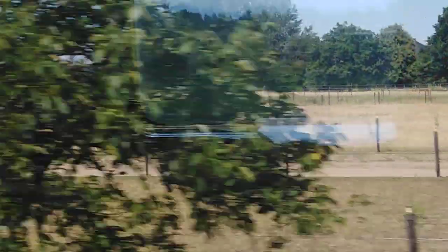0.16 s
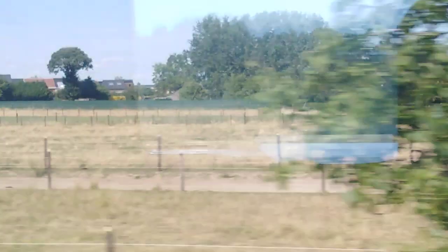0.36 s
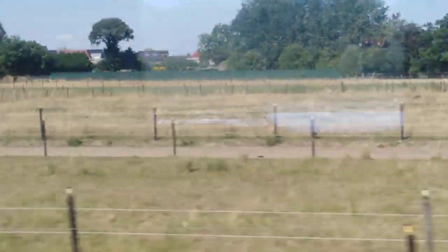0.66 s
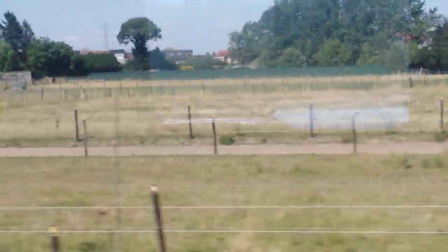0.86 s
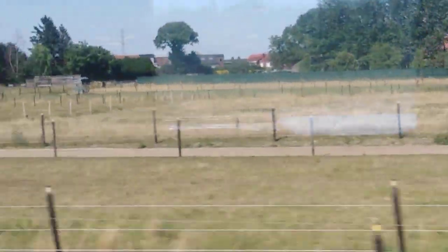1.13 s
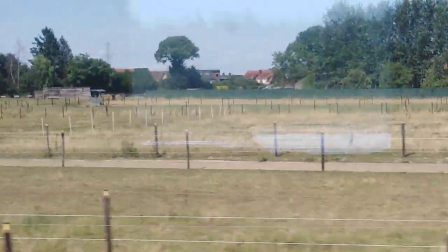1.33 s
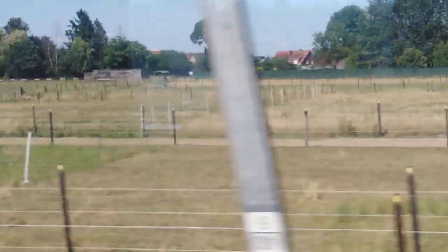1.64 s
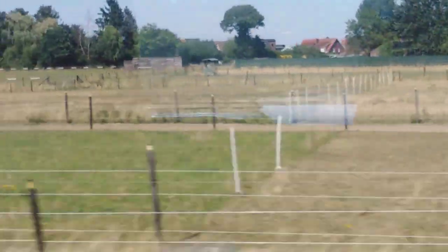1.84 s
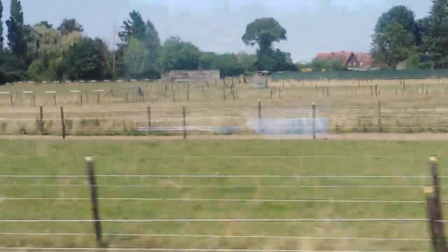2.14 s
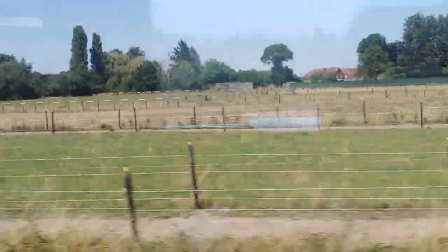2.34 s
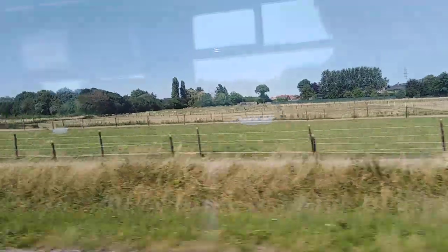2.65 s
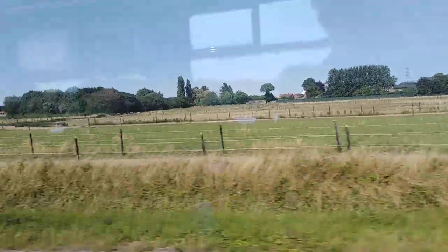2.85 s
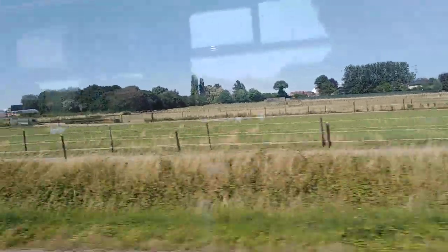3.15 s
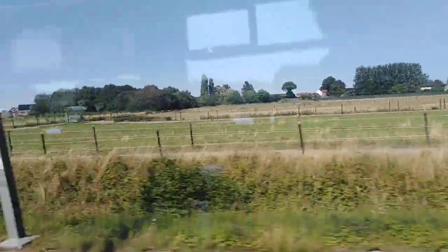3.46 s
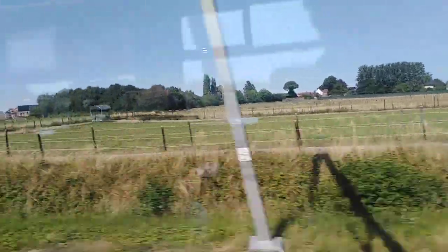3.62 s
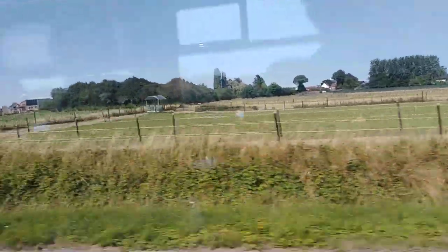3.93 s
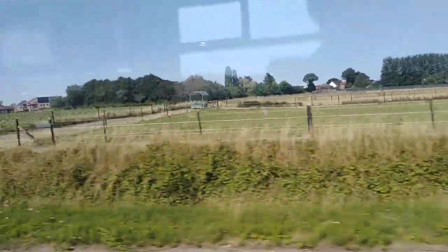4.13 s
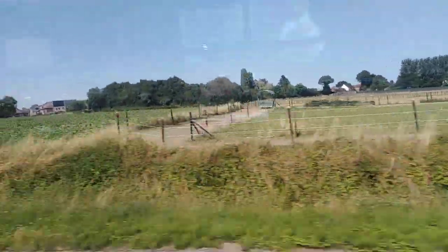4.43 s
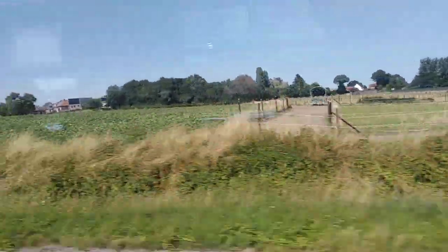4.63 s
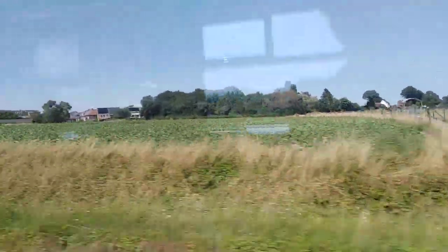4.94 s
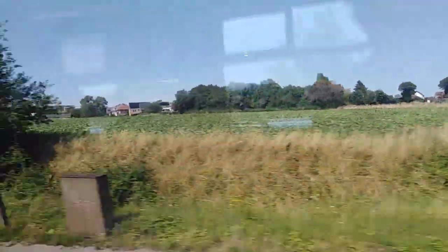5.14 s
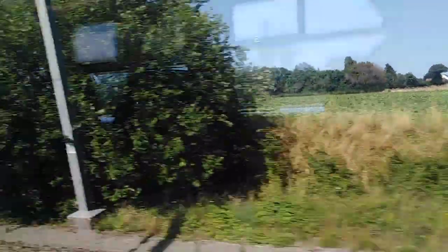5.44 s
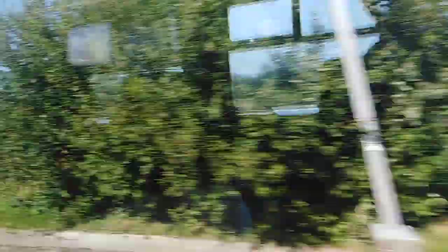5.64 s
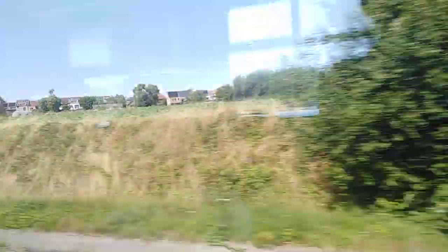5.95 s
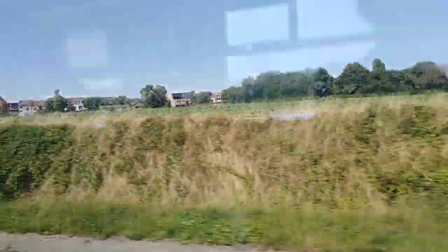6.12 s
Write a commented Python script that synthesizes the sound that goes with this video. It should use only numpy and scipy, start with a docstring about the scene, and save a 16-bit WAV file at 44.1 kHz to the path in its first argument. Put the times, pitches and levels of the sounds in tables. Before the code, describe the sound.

The whole stretch, a little over six seconds, is the inside of a passenger train already at speed and holding it. A deep, nearly centred floor boom and carriage drone run continuously, bumping up in soft irregular surges, notably around 0.6, 1.0, 2.5, 3.2, 4.25 and 5.6 seconds, with brief sags between. Above lies a broad rushing wheel and rail roar, swelling gently on rougher track, plus diffuse air hiss. A faint gear hum and a thin, fluttering motor whine of almost constant pitch waver, dipping near 1.75 and 3.15 seconds and fading at the end. Tiny dry trim ticks come at 1.3 and around 3.4 to 3.55; a minute very high squeak at 1.5. Short hollow rail howls rise around 4.8 to 4.95, then weaker at 5.5 and 5.9. The train keeps running to the end.

```python
"""Train carriage at speed

Inside a passenger train on welded track, at a window seat: the floor booms and the carriage drones as
resonant and coloured noise; wheel and rail roar later on the left and howl on rippled rail; air hisses.
Gears and motors sing faintly as wavering sines, the trim ticks as noise bursts and a panel seam squeaks once.
"""
import sys
import numpy as np
from scipy import signal
from scipy.fft import rfft, irfft
from scipy.io import wavfile
from scipy.ndimage import uniform_filter1d

SR = 44100
rng = np.random.default_rng(int(sys.argv[2]) if len(sys.argv) > 2 else 0)


def int16_out(signal):
    """Quantize to a 16-bit WAV file."""
    q = np.round(np.clip(np.atleast_2d(signal).T, -1, 1) * 32767)
    wavfile.write(sys.argv[1], SR, q.astype(np.int16))


N = 276948
TIME = np.arange(N) / SR
FREQ = np.maximum(np.arange(N // 2 + 1) * SR / N, 1)
LEFT_RIGHT = np.array([[1], [-1]])
WINDOW_LAG_S = 0.00037  # left behind right


def undb(db):
    """Decibels to amplitude gain."""
    return 10 ** (np.asarray(db) / 20)


def curves(table):
    """Columns of a timed table, interpolated to one value a sample."""
    s, *columns = np.transpose(table)
    return [np.interp(TIME, s, column) for column in columns]


def hump(s, half_s):
    """Gaussian rise and fall around time s, 1 at its top and 1/e at half_s either side."""
    return np.exp(-((TIME - s) / half_s) ** 2)


def contour(points):
    """Gain at every frequency from (Hz, dB) points, straight over log frequency."""
    hz, db = np.transpose(points)
    return undb(np.interp(np.log(FREQ), np.log(hz), db))


def colour(points):
    """Contour that falls steeply, by the fourth power of frequency, beyond both ends."""
    inside = np.minimum(FREQ / points[0][0], points[-1][0] / FREQ)
    return contour(points) * np.minimum(1, inside) ** 4


def resonances(modes):
    """Gain at every frequency of steep-sided (Hz, width Hz, dB) modes that add in power."""
    power = 0
    for hz, width_hz, db in modes:
        detune = (FREQ - hz) / width_hz * np.sqrt(2)
        power = power + (undb(db) / (1 + detune ** 2)) ** 2
    return np.sqrt(power)


def noise(gain, likeness=0, lag_s=0):
    """Stereo noise of a given density: a shared part, later on the left, and a diffuse part."""
    shared, left, right = rfft(rng.standard_normal((3, N))) * np.sqrt(SR / 2)
    share = np.clip(likeness, 0, 1)  # of the power
    direct = shared * np.exp(-1j * np.pi * FREQ * lag_s * LEFT_RIGHT)
    diffuse = np.array([left, right])
    return irfft(gain * (np.sqrt(share) * direct + np.sqrt(1 - share) * diffuse), N)


def steady(x, span_s):
    """Evens out the chance swells of a noise that last longer than span_s."""
    k = int(span_s * SR)
    power = uniform_filter1d(uniform_filter1d(np.mean(x ** 2, axis=0), k), k)
    return x * np.sqrt(power.mean() / power)


def walk(rate_hz):
    """Random levels held 1 / rate_hz seconds, slewed twice and scaled to a standard deviation of 1."""
    k = int(SR / rate_hz)
    steps = np.repeat(rng.standard_normal(N // k + 1), k)
    smooth = uniform_filter1d(uniform_filter1d(steps, k), k)[:N]
    return smooth / smooth.std()


def tone(hz, db, pan_db, lead_rad, waver_db, wander_rad):
    """Machine tone whose level and phase waver at each ear as the carriage sways; db is RMS."""
    phase = 2 * np.pi * np.cumsum(hz) / SR + lead_rad * LEFT_RIGHT / 2
    phase = phase + wander_rad * np.array([walk(14), walk(20)])
    level_db = db + pan_db * LEFT_RIGHT / 2 + waver_db * np.array([walk(13), walk(17)])
    return np.sqrt(2) * undb(level_db) * np.sin(phase)


def squeak():
    """Two panels rub at their seam for a moment: a short hump of resonant noise, very high and faint."""
    # Each row: centre in Hz, width in Hz, density in dB per Hz.
    seam_modes = [(13000, 600, -91), (14100, 550, -90)]
    return hump(s=1.477, half_s=.011) * noise(resonances(seam_modes))


def trim(tail_s=0.055, tail_db=-24, chatter_db=4.5):
    """Panels on either side slip with a tiny dry tick, then chatter briefly: decaying noise bursts."""
    # Each row: start in seconds, level before colouring in dB, left minus right in dB, decay in seconds.
    ticks = [(1.2915, -38, -11, .0007), (1.2974, -36.5, -8, .0009), (3.3712, -34, 12, .0003),
             (3.3795, -47, 6, .002), (3.3857, -46, 2, .0003), (3.551, -47, 4, .0003)]
    # Colour of the trim's ring. Each row: frequency in Hz, gain in dB.
    trim_colour = [(3000, -22), (6000, 3), (9000, 4.5), (12000, 4), (15000, -8)]
    envelope = np.zeros((2, N))
    chatter = undb(tail_db + chatter_db * walk(400))
    for s, db, pan_db, decay_s in ticks:
        age_s = np.maximum(TIME - s, 0)
        shape = (TIME >= s) * (np.exp(-age_s / decay_s) + chatter * np.exp(-age_s / tail_s))
        envelope += undb(db + pan_db * LEFT_RIGHT / 2) * shape
    return irfft(rfft(envelope * rng.standard_normal((2, N))) * colour(trim_colour), N)


def gears():
    """Two gearboxes with wheels of slightly different size sing on mesh harmonics and beat slowly."""
    mesh_hz = 517.5
    # Each row: multiple of the mesh rate, level in dB, left minus right in dB, left phase lead in rad.
    harmonics = [(2, -48.5, 1, -0.43), (4, -53, 9, 0.89)]
    # Each row: mesh offset in Hz, level relative to the harmonic in dB.
    gearboxes = [(-0.3, -1), (1.0, -6)]
    # Slow swell of the song. Each row: time in seconds, level change in dB.
    swell_db, = curves([(0, 0.5), (.5, 1.5), (3.3, 2.5), (4.4, -1.5), (6.28, -3)])
    song = 0
    for k, db, pan_db, lead_rad in harmonics:
        for offset_hz, box_db in gearboxes:
            hz = np.full(N, k * (mesh_hz + offset_hz))
            song = song + tone(hz, db + box_db + swell_db, pan_db, lead_rad, waver_db=2.5, wander_rad=0.3)
    return song


def drive():
    """The gears whine near their third mesh harmonic, with a fast uneven flutter and shaft-rate sidebands; a
    thin motor tone sings above."""
    shaft_hz, motor_hz = 51.7, 2189
    rasp_db, rasp_rate_hz = 2.5, 110
    # Each row: time in seconds, whine pitch in Hz.
    whine_hz, = curves([(0, 1544.5), (2.5, 1548.5), (6.28, 1551)])
    # Each row: time in seconds, whine level before flutter and waver in dB.
    whine_db, = curves([(0, -43.5), (.6, -43.5), (.85, -44), (1.15, -45), (1.5, -40), (1.76, -64),
                        (2.1, -43), (2.35, -43.5), (2.7, -43.5), (2.87, -43), (3.0, -42.5), (3.15, -58),
                        (3.35, -38), (3.48, -45), (3.6, -48), (3.95, -42), (4.08, -45), (4.26, -38),
                        (4.4, -44), (4.55, -39), (4.7, -39), (5.0, -47.5), (5.35, -40), (5.7, -43),
                        (6.03, -40.5), (6.28, -63)])
    # Each row: shaft orders above the whine, level relative to it in dB.
    shaft_sidebands = [(-1, -15), (1, -11), (2, -13)]
    # Each row: time in seconds, thin tone's level before waver in dB.
    motor_db, = curves([(0, -67), (.5, -47), (.9, -56), (1.5, -59), (2.2, -57), (6.28, -61)])

    flutter_db = rasp_db * walk(rasp_rate_hz)
    whine = tone(whine_hz, whine_db + flutter_db, pan_db=9, lead_rad=0.91, waver_db=1.7, wander_rad=0.73)
    sidebands = 0
    for k, db in shaft_sidebands:
        side_hz = whine_hz + k * shaft_hz
        sidebands = sidebands + tone(
            side_hz, whine_db + db, pan_db=-1, lead_rad=2.2, waver_db=4.0, wander_rad=1.2)
    motor = tone(np.full(N, motor_hz), motor_db, pan_db=-2, lead_rad=-0.3, waver_db=4.0, wander_rad=0.7)
    return whine + sidebands + motor


def howl():
    """Short ripples on the rail make it ring in a few broad resonances as the wheels run over them."""
    # Each row: centre in seconds, half length in seconds, level in dB.
    ripples = [(4.79, 0.12, -0.5), (4.94, 0.071, 2.5), (5.47, 0.089, -1), (5.877, 0.088, -4)]
    # Each row: centre in Hz, width in Hz, density before the ripple level in dB per Hz.
    howl_modes = [(600, 30, -59), (665, 26, -57), (814, 27, -54.5), (872, 31, -52), (990, 59, -59)]
    swell = np.sqrt(sum((undb(db) * hump(s, half_s)) ** 2 for s, half_s, db in ripples))
    lag_s = WINDOW_LAG_S * np.interp(FREQ, [650, 850], [.3, .9])
    ring = noise(resonances(howl_modes), likeness=0.92, lag_s=lag_s)
    return swell * steady(ring, span_s=.08)


def rolling(hiss_follows=0.3, rings_follow=0.4):
    """Rail and wheels roar in from the window side, louder on rough rail; air hisses all around."""
    rail_level_db, wheels_level_db, rings_level_db, air_level_db = -1, -1.24, -.5, -1.3
    # Broad spectra. Each row: frequency in Hz, density before level changes in dB per Hz.
    rail_colour = [(400, -73), (650, -67.5), (830, -57.5), (900, -60), (950, -61), (1030, -58), (1130, -62),
                   (1260, -64.5), (1400, -69.5), (2200, -115)]
    wheel_colour = [(1000, -76), (1420, -78), (1600, -62.5), (1680, -62.5), (1800, -63.5), (1960, -68),
                    (2220, -68), (2480, -72.5), (2800, -72.5), (3200, -77), (3620, -74), (4100, -83.5),
                    (6000, -100)]
    air_colour = [(1000, -82), (3000, -84), (4500, -81), (5500, -84), (7200, -84), (7680, -80.5),
                  (8250, -84), (8700, -94), (9200, -105), (11500, -108), (12500, -124)]
    # Wheels and running gear. Each row: centre in Hz, width in Hz, density before level changes in dB per Hz.
    ring_modes = [(803, 7.1, -60.5), (856, 11, -58.5), (937, 15, -71.5), (1050, 40, -62.5), (1265, 72, -68),
                  (1420, 86, -69.5), (1488, 27, -60), (1554, 38, -57), (1600, 20, -59), (1670, 7.9, -62.5),
                  (1750, 53, -61.5), (1855, 14, -66), (2204, 25, -76), (2227, 62, -70.5), (2480, 20, -69.5)]
    # Each row: centre in seconds, half length in seconds, rise of rail roar in dB, of wheel roar in dB.
    rough_rail = [(.5, 0.25, 2, 2.6), (1.435, 0.3, 1, 1.5), (1.993, 0.15, 1.5, 0.9), (2.48, .27, 1, 1),
                  (3.3, 0.36, 0, 2), (4.2, 0.26, .5, 2.9), (4.698, .17, 0, 1.5), (5.023, 0.3, 1.2, 1.5),
                  (5.7, 0.43, 1, 1.5)]
    # Each row: frequency in Hz, share of wheel power straight from the window.
    wheel_direct = [(1050, 0.28), (1250, 0.65), (1800, 0.6), (2200, 0.17), (2750, 0.27), (3400, 0.11)]
    # Hiss swell. Each row: time in seconds, level change in dB.
    air_db, = curves([(0, -0.7), (1.2, 0), (3.4, 0.4), (4.3, 1.6), (5.1, 1.2), (5.6, 0.9), (6.28, -0.6)])

    rail_db = sum(db * hump(s, half_s) for s, half_s, db, _ in rough_rail)
    wheel_db = sum(db * hump(s, half_s) for s, half_s, _, db in rough_rail)
    rail_likeness = np.interp(FREQ, [700, 850, 1100], [.3, .7, .2])
    directness = np.interp(FREQ, *np.transpose(wheel_direct))
    rail = steady(noise(colour(rail_colour), rail_likeness, WINDOW_LAG_S), span_s=0.14)
    wheels = steady(noise(colour(wheel_colour), directness, WINDOW_LAG_S), span_s=0.4)
    rings = steady(noise(resonances(ring_modes), directness, WINDOW_LAG_S), span_s=0.17)
    air = noise(colour(air_colour))

    flutter_db = 0.63 * walk(21.87)  # the contact patches wander over the rail
    treble = undb(wheels_level_db + wheel_db) * wheels
    treble = treble + undb(air_level_db + air_db + hiss_follows * wheel_db) * air
    roar = undb(rail_level_db + rail_db) * rail
    return roar + undb(rings_level_db + rings_follow * wheel_db) * rings + treble * undb(flutter_db)


def rumble():
    """Track unevenness shakes floor, cabin air, panels and shell: noise, mostly alike on both sides."""
    floor_level_db, cabin_level_db, panel_level_db = -3.7, -.5, -0.77
    lull_half_s = 0.021
    # Resonances. Each row: centre in Hz, width in Hz, density before level changes in dB per Hz.
    floor_modes = [(66.4, 15.5, -48.5), (74, 21, -41), (86.5, 25, -48.5)]
    cabin_modes = [(112.2, 15.4, -45), (128, 13.6, -45.5), (146.8, 8.6, -46)]
    panel_modes = [(203.5, 12.6, -47), (228.2, 18.5, -52.5), (261, 15, -60), (295, 8.6, -58),
                   (415.7, 6.3, -62), (431, 7.5, -62.5), (513.4, 19.5, -63), (570, 7.7, -66.5),
                   (666.3, 10.3, -60.5)]
    # Body shell. Each row: frequency in Hz, density before level changes in dB per Hz.
    shell_colour = [(30, -78), (50, -55.5), (130, -55), (175, -57), (265, -58.5), (315, -58), (350, -56),
                    (470, -64), (590, -61.5), (690, -63), (820, -70), (1100, -84)]
    # Track dips jolt a bogie and the floor booms. Each row: centre and half length in seconds, rise in dB.
    jolts = [(0.025, .04, 3), (0.5, 0.075, 6.5), (0.62, 0.036, 9), (0.92, .04, 7), (1.045, 0.028, 9.5),
             (1.44, 0.031, 2.5), (1.56, .03, 6), (1.768, 0.038, 6.5), (1.905, 0.032, 8), (2.154, .04, 3.5),
             (2.347, 0.076, 5), (2.54, 0.043, 9), (2.698, 0.05, 5), (2.914, 0.044, 4.5), (3.053, 0.036, 8),
             (3.19, 0.057, 10.5), (3.496, 0.046, 5), (3.64, .065, 5.5), (3.885, 0.025, 6.5),
             (4.062, 0.074, 6.5), (4.253, 0.05, 9.5), (4.404, 0.027, 7.5), (4.6, 0.037, 4.5),
             (5.09, .08, 4), (5.53, 0.045, 3), (5.611, 0.029, 10), (6.11, .05, 5.5), (6.234, .04, 0.5)]
    # Springs unload, the boom mostly sags. Each row: centre in seconds, level change in dB.
    lulls = [(.69, -14), (.8, -1), (.99, -18), (1.18, -4), (2.78, 1), (3.11, -6), (4.17, -14), (5.73, -6)]
    # Levels of air boom, panel drone and shell roar, the shell nearly even.
    # Each row: time in seconds, level change in dB.
    cabin_db, = curves([(0, 1), (.06, -4), (.13, 3), (.22, -1.5), (.45, -4.5), (.55, 0.5), (.75, 0),
                        (.87, 1), (1.08, 1.5), (1.15, -3.5), (1.35, 0.5), (1.48, 0), (1.58, -2),
                        (1.68, 3.5), (1.8, 0.5), (2.05, -2), (2.28, 4.5), (2.37, -1.5), (2.55, -1),
                        (2.68, 0), (2.77, 4), (2.87, -7), (3, -3), (3.13, -8), (3.35, -3.5), (3.5, -.5),
                        (3.75, 2.5), (3.85, -3.5), (4.08, 0), (4.16, -2), (4.25, 1), (4.45, -3), (4.7, 1.5),
                        (4.95, -2.5), (5.2, 1), (5.3, -2.5), (5.55, -2.5), (5.67, 1), (5.93, -5),
                        (6.05, -4.5), (6.28, -2.5)])
    panel_db, = curves([(0, 0.5), (.2, 2), (.43, -2.5), (.7, -1.5), (1.05, 1.5), (1.15, -4), (1.3, -2),
                        (1.57, 3.5), (1.7, -3), (1.8, 2.5), (1.92, -2.5), (2.15, 3.5), (2.27, 3),
                        (2.45, 2.5), (2.65, -2.5), (2.77, 5), (2.9, 0), (3.15, -1), (3.35, 3), (3.47, -5.5),
                        (3.63, 6.5), (3.85, 0), (4.05, 2.5), (4.33, -2.5), (4.48, 4.5), (4.62, -3),
                        (4.8, -2), (5.15, -1), (5.3, -5), (5.6, 5), (5.75, -1.5), (5.92, -2.5), (6.03, -18),
                        (6.17, 2.5), (6.28, 0.5)])
    shell_db, = curves([(0, -2.5), (.12, -1), (.24, 1), (.35, -.5), (.68, 1.5), (.8, -0.5), (1.15, 0.5),
                        (1.28, -2.5), (1.42, -1), (1.95, 0), (2.2, 0), (2.62, 1), (2.79, -3.5), (2.95, 1),
                        (3.07, -2.5), (3.2, 1), (3.35, 0), (4.1, -1), (4.35, 0.5), (4.5, -1), (5.1, 0),
                        (5.27, 1), (5.68, -1), (5.85, 1), (6.15, 1), (6.28, 0)])

    jolt_db = sum(db * hump(s, half_s) for s, half_s, db in jolts)
    lull_db = sum(db * hump(s, lull_half_s) for s, db in lulls)
    floor = steady(noise(resonances(floor_modes), likeness=0.955), span_s=0.083)
    cabin = steady(noise(resonances(cabin_modes), likeness=0.92), span_s=0.098)
    panels = steady(noise(resonances(panel_modes), likeness=0.97), span_s=0.13)
    shell_likeness = np.interp(FREQ, [400, 480], [.91, .7])
    shell = steady(noise(colour(shell_colour), shell_likeness), span_s=0.11)

    boom = undb(floor_level_db + jolt_db + lull_db) * floor + undb(cabin_level_db + cabin_db) * cabin
    return boom + undb(panel_level_db + panel_db) * panels + undb(shell_db) * shell


def scene():
    """Running noise, coloured differently on each side, with gears, motors, ticks and squeak."""
    # Each row: frequency in Hz, left minus right in dB.
    lean = [(70, -0.7), (170, -0.4), (205, 0.6), (310, -3.3), (460, 1.6), (525, -4.5), (640, -0.7),
            (720, -0.5), (790, -2), (900, 0.5), (1000, -3.5), (1180, 2), (1320, -0.5), (1480, 3), (2000, 3),
            (3050, 3.5), (3600, -0.5), (5000, -0.5), (7600, 5.5), (8600, -2)]
    running = rumble() + rolling() + howl()
    running = irfft(rfft(running) * contour(lean) ** (LEFT_RIGHT / 2), N)
    return running + gears() + drive() + trim() + squeak()


def record(dry):
    """The microphone drops the deepest bass, and the top is cut."""
    low_cut_hz, top_hz = 48.7, 15000
    bass_cut = signal.butter(4, low_cut_hz, "high", fs=SR, output="sos")
    top_cut = signal.ellip(8, .2, 70, top_hz, fs=SR, output="sos")  # ripple dB, stopband dB
    return signal.sosfilt(top_cut, signal.sosfilt(bass_cut, dry))


dry = scene()
out = record(dry)
int16_out(out)
```